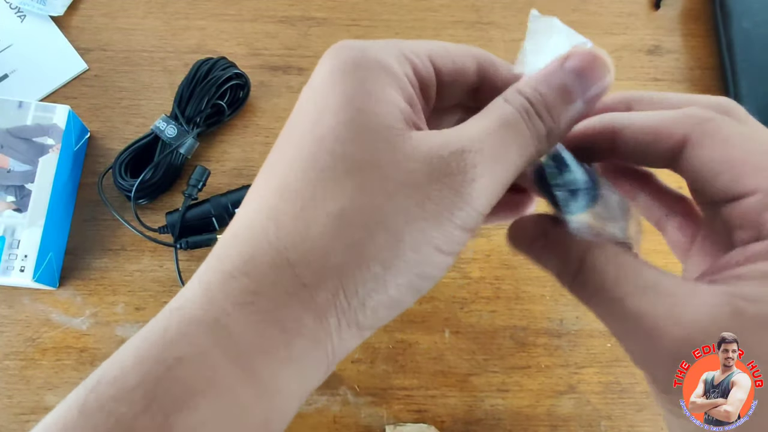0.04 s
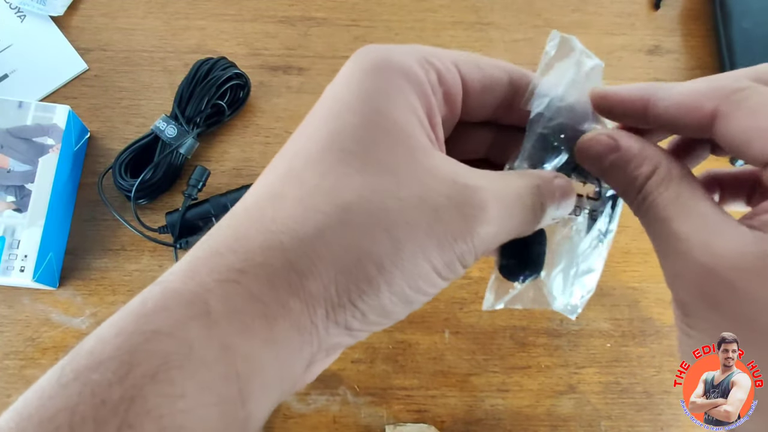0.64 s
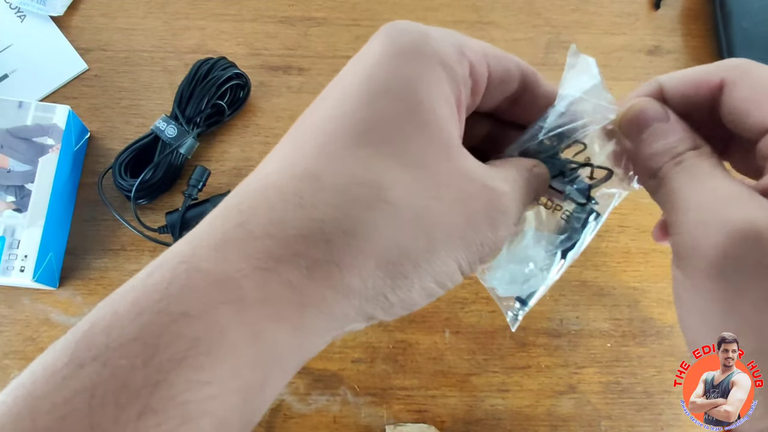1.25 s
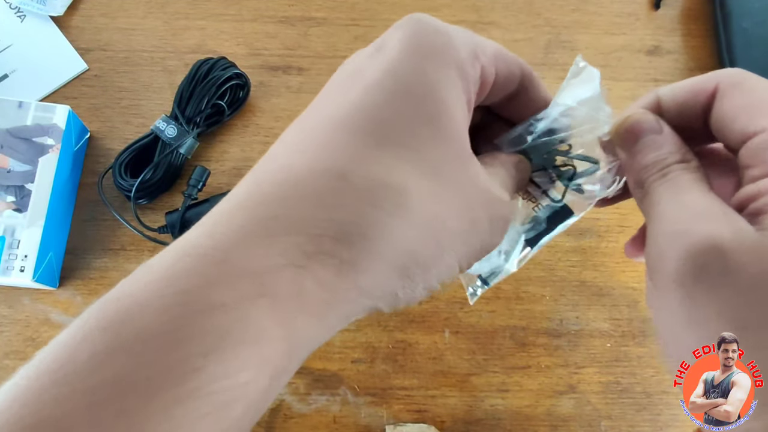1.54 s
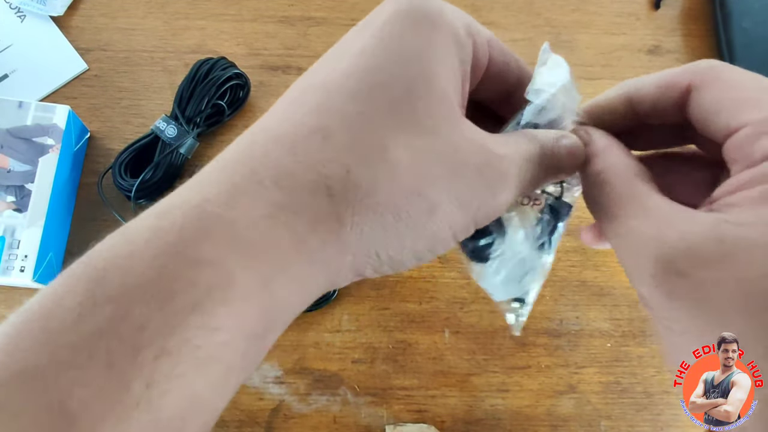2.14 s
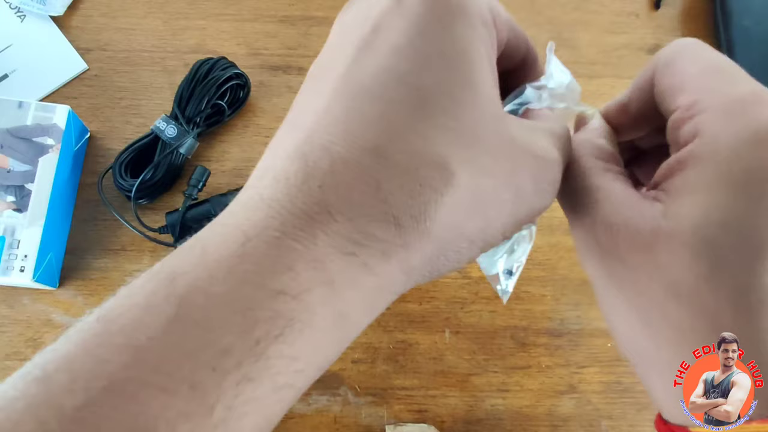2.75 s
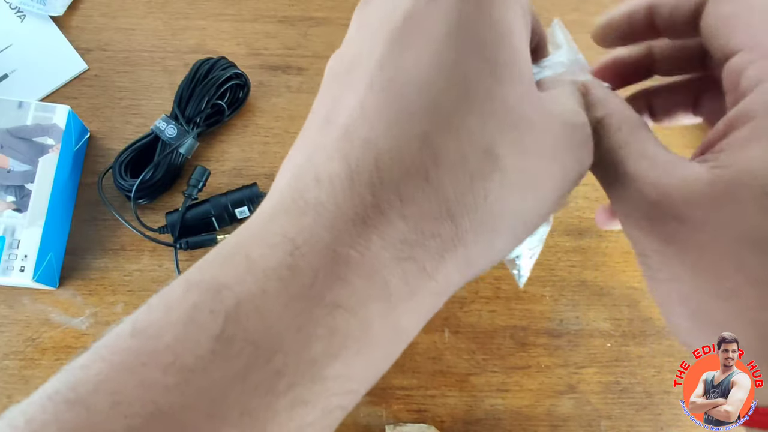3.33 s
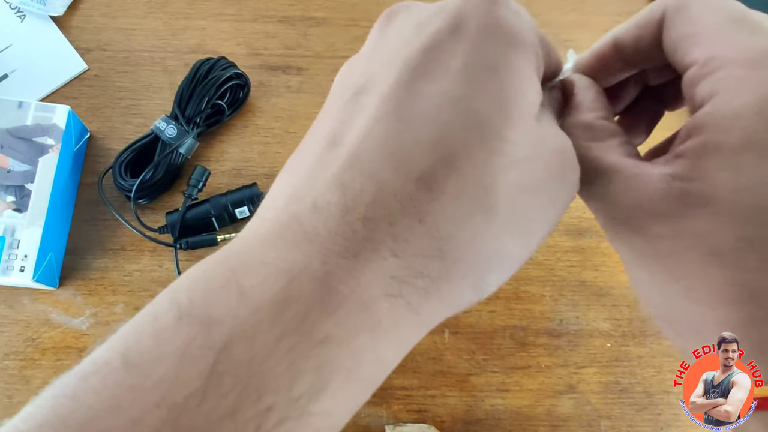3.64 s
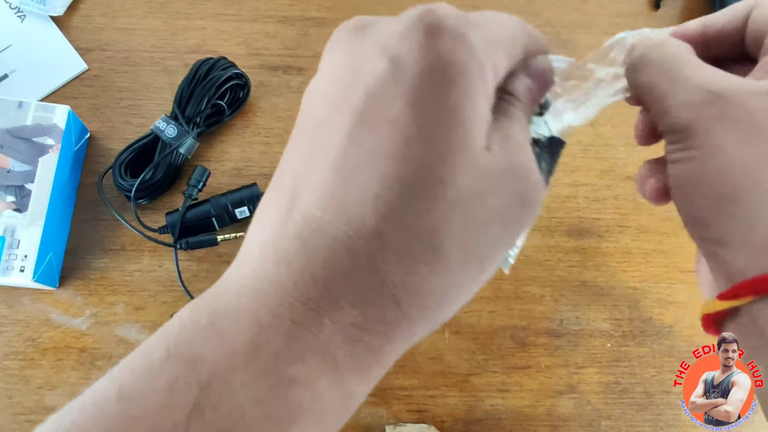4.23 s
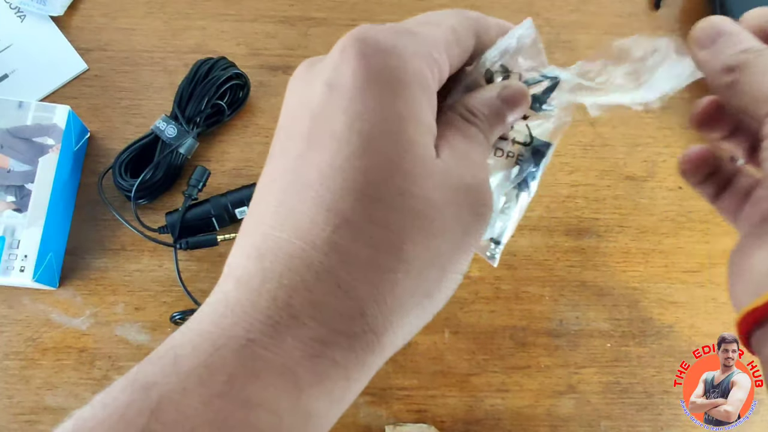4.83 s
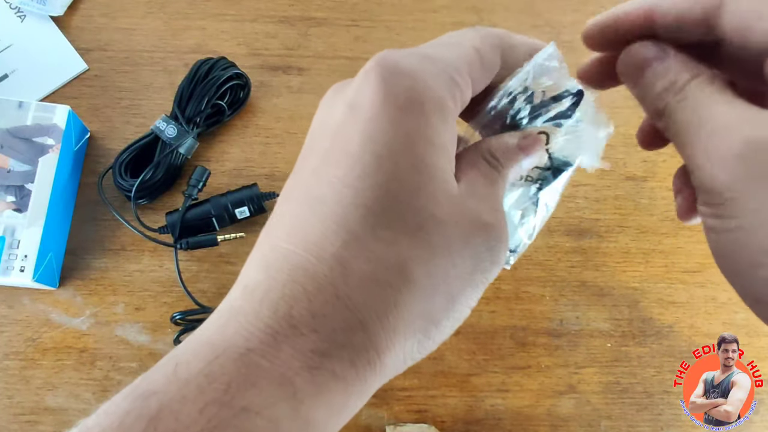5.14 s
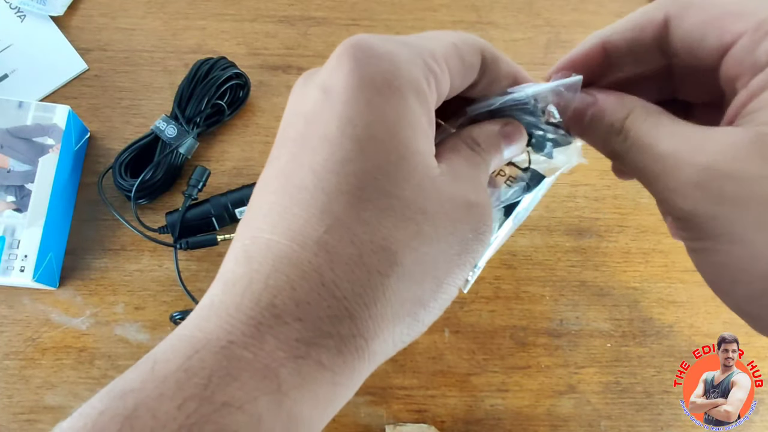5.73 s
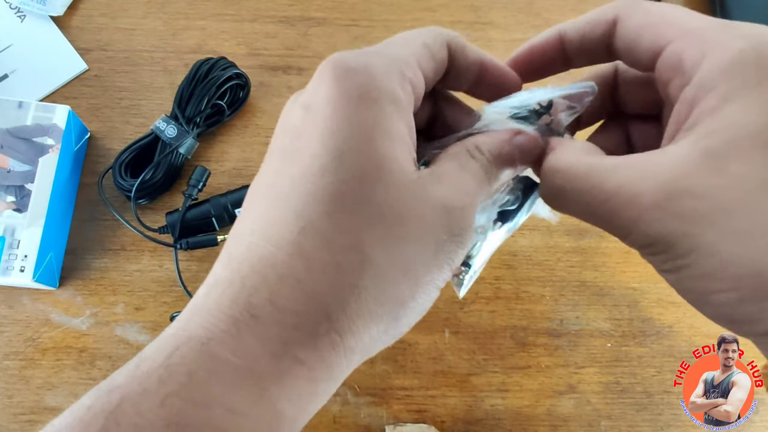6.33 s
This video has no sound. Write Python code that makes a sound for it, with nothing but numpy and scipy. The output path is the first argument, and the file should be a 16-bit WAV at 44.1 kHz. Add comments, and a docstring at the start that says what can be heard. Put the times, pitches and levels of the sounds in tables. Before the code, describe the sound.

A small plastic zip bag is handled close to the microphone in a small room. From the start, each squeeze brings fine crinkling and little ticks, with bigger creases snapping sharply at uneven intervals. The small hard contents knock lightly now and then, most clearly at about 3.1 seconds. From around 2.3 seconds the top is pinched taut and the snaps sound fuller for a second. Near 4.2 seconds the zip seal tears open in one very short, bright rasp with the loudest crackles. Busy crinkling follows until about 5 seconds, then lighter handling continues to the end at about 6.5 seconds. A few dull pops from a faulty microphone contact come around 3.6 to 3.8 seconds and again between 5 and 6 seconds. Underneath lie faint rubbing of skin, a wavering low electrical hum, rumble and hiss.

```python
"""Two hands turn a small plastic zip bag above a desk. From the start, each squeeze buckles the film
into fine crinkle and small ticks, big creases snap sharply, and now and then the contents knock.
From 2.25 s the top is pinched taut and the snaps gain body. From 3.6 s a breaking microphone contact
makes a few dull pops. Near 4.2 s the zip tears open in one short stick-slip rasp, and the handling
goes on. Under it all, in a small room, lie rubbing skin, wavering mains hum, rumble and hiss."""
import sys
import numpy as np
from scipy import signal
from scipy.fft import rfft, irfft, next_fast_len
from scipy.io import wavfile
from scipy.ndimage import uniform_filter1d

SR = 44100
rng = np.random.default_rng(int(sys.argv[2]) if len(sys.argv) > 2 else 0)


def pcm_store(signal):
    """Save signal as 16-bit PCM."""
    levels = np.round(np.clip(np.atleast_2d(signal), -1, 1) * 32767)
    wavfile.write(sys.argv[1], SR, levels.astype(np.int16).T)


N = 290178
TIME = np.arange(N) / SR

# Big creases snapping through. Each row: start in seconds, level of the first 5 ms in dB,
# ring of the facet in Hz, relative treble in dB.
BIG_CREASES = [(0.0557, -37, 5750, -15), (0.0709, -32, 8790, -6.5), (0.0957, -25.5, 3000, -8),
               (0.1803, -33, 4830, -10.5), (0.2305, -28.5, 5860, -8.5), (0.2578, -36, 4610, -8.5),
               (0.532, -28.5, 6790, -7), (0.547, -37, 5960, -9.5), (0.5742, -33, 4200, -27),
               (0.6866, -39.5, 4150, -13), (0.8108, -35.5, 4950, -7), (0.8347, -30, 5970, -7),
               (0.8651, -40.5, 4966, -8), (0.9222, -35.5, 3945, -7), (0.9417, -31, 3980, -16),
               (0.969, -37, 3986, -16), (1.0032, -27, 6010, -8), (1.011, -36, 3880, -17),
               (1.0351, -26.5, 5530, -13), (1.0962, -35, 7650, -3), (1.1702, -31, 6020, -8),
               (1.1872, -29.5, 2456, -10), (1.2055, -40, 3864, -11), (1.327, -37.5, 9620, -2),
               (1.3713, -31, 3940, -24), (1.4087, -33, 3200, -17), (1.4201, -36.5, 6920, -6),
               (1.5371, -31, 2810, -5.5), (1.5558, -28, 8020, -2), (1.5723, -29, 6026, -9),
               (1.6752, -37, 3950, -2), (1.7068, -32, 6154, -7.5), (1.8888, -36.5, 6000, -7.5),
               (1.99, -38.5, 7130, -8.5), (2.0366, -39, 6020, -5.5), (2.1442, -29.5, 5680, -8),
               (2.151, -34, 4460, -8), (2.1683, -30.5, 7460, -4), (2.2172, -29, 5010, -2.5),
               (2.2362, -26.5, 3975, -8), (2.2798, -31, 6510, -10), (2.291, -30.5, 3800, -10.5),
               (2.3098, -30, 4024, -3), (2.3944, -29, 4360, -7), (2.5109, -36, 3894, -14),
               (2.6145, -39.5, 6930, -3.5), (2.662, -36.5, 7480, -11.5), (2.6917, -37.5, 4033, -4),
               (2.8112, -30, 3840, -19), (2.8344, -38, 7060, -14), (2.9128, -28, 6186, -8),
               (2.961, -38.5, 2836, -22), (2.9737, -28, 3610, -2.5), (3.0095, -35.5, 7200, -6),
               (3.0402, -35.5, 1550, -10), (3.0513, -30, 6060, -9), (3.0871, -34, 4780, -6),
               (3.1717, -33.5, 3140, -9), (3.275, -25, 3810, -2.5), (3.321, -38.5, 4820, -12),
               (3.5043, -36, 4930, -2), (3.5157, -30.5, 6860, -3.5), (3.5515, -31, 3883, -6.5),
               (3.6061, -31, 3814, -9), (3.6782, -38.5, 4000, -13), (3.7183, -39, 7380, -11),
               (3.7355, -37, 4830, -5), (3.7824, -36, 6500, 1), (3.912, -40.5, 8230, -7),
               (4.054, -37, 6156, -9.5), (4.142, -33.5, 6370, -7), (4.1604, -28, 6260, -6),
               (4.185, -20.5, 6060, -3), (4.195, -22, 6120, -5.5), (4.2335, -19.5, 4760, -4.5),
               (4.285, -34, 2480, -11), (4.3233, -35.5, 2670, -6.5), (4.412, -33, 3880, -4),
               (4.4171, -31.5, 7340, -4), (4.429, -33.5, 4860, -6.5), (4.446, -30.5, 3804, -8),
               (4.4673, -28, 3750, -2), (4.4894, -23, 6450, -5), (4.5549, -35.5, 4900, -11),
               (4.7192, -29.5, 6540, -7.5), (4.788, -33, 5620, -10), (4.822, -36.5, 3136, -16),
               (4.8352, -34, 6145, -3), (4.905, -41, 2530, -16), (4.933, -41.5, 2755, -22.5),
               (5.1646, -33, 2561, -11), (5.3035, -39, 6990, -5), (5.3182, -36, 7170, -6),
               (5.4028, -36.5, 6700, -3), (5.5176, -38.5, 4793, -7), (5.53, -35, 2477, -13.5),
               (5.6277, -38.5, 3947, -14), (5.6374, -30.5, 7920, -7), (5.7805, -37.5, 5950, -10),
               (5.8506, -37.5, 4720, -10), (5.9086, -37.5, 3770, -17), (5.9972, -36.5, 3935, -7),
               (6.1367, -36.5, 6517, -5.5), (6.4004, -34.5, 6810, -6), (6.4562, -34.5, 4740, -11.5)]
def cracks(lead_copy_db=-18, max_lead_s=.0046):
    """Snap-through instability: big creases flip; a faint copy just ahead softens each attack."""
    out = np.zeros((2, N))
    draws = rng.random((len(BIG_CREASES), 2))
    for (s, db, ring_hz, treble_db), (slowness, lead) in zip(BIG_CREASES, draws):
        sound = undb(db) * buckle(s, ring_hz, treble_db, slowness)
        add(out, s, sound)
        add(out, s - max_lead_s * lead, undb(lead_copy_db) * sound)
    return out


# Spectrum of the snapping film. Each row: frequency in Hz, gain in dB.
FILM_SPECTRUM = [(150, -20), (450, -1), (850, -11.5), (1350, 1.5), (1850, -6), (2350, 2), (3200, -0.5),
                 (3900, 2.5), (6300, 0.5), (9000, -2), (12000, -6), (14500, -14.5), (16000, -25)]
def buckle(s, ring_hz, treble_db, slowness, slack_db=-3, taut_db=6.5):
    """Buckling: facet shape and film tension colour each snap; rms 1 over its first 5 ms."""
    taut_start_s, taut_length_s = 2.25, 1.1
    rise_s = .0005 + .0019 * slowness ** 2  # some creases flip at once, others run along the film
    sound = snap(ring_hz, rise_s, decay_s=.0016, tail_db=-13.5, tail_s=.0065)
    facet_peaks = zip(np.geomspace(2000, 15000, 18), 2.4 * rng.standard_normal(18))
    sound = colour(sound, [(1700, 0), *facet_peaks])
    low_db, body_db = slack_db + 3 * rng.standard_normal(2)
    body_db += taut_db * (0 < s - taut_start_s < taut_length_s)
    tilt = [(600, low_db), (1400, body_db), (2400, 0), (5800, 0),
            (8500, treble_db + 9), (15000, treble_db + 9.5)]
    sound = colour(colour(sound, FILM_SPECTRUM), tilt)
    return sound / np.std(sound[:, :220], axis=1, keepdims=True)


def snap(ring_hz, rise_s, decay_s, tail_db, tail_s, size=1400):
    """Damped bending waves scatter through the film while one facet resonates."""
    t = np.arange(size) / SR
    decay = np.exp(-t / decay_s) + undb(tail_db) * np.exp(-t / tail_s)
    envelope = (1 - np.exp(-t / rise_s)) * decay
    waves = rng.standard_normal((2, size)) * envelope * undb(3 * rng.standard_normal(size))
    ring = signal.lfilter(*signal.iirpeak(ring_hz, Q=11, fs=SR), waves)
    return waves + 1.6 * ring


# The fingers squeeze or turn the bag. Each row: start in seconds, length in seconds, level in dB.
FINGER_SQUEEZES = [(0, .15, -44), (0.198, 0.049, -40.5), (0.298, .1, -54), (0.422, 0.077, -44.5),
                   (0.51, 0.035, -41), (0.669, .05, -52), (0.793, 0.093, -50), (0.926, 0.067, -44.5),
                   (0.999, 0.068, -40.5), (1.15, .06, -46), (1.316, 0.045, -44), (1.53, 0.066, -45),
                   (1.692, .04, -49), (1.843, .05, -54), (2.055, 0.11, -48), (2.147, 0.24, -43.5),
                   (2.513, 0.026, -46), (2.618, 0.021, -50.5), (2.725, 0.079, -47), (2.932, .16, -45.5),
                   (3.24, 0.15, -47), (3.489, 0.091, -46), (3.604, 0.31, -51), (3.913, .05, -53),
                   (4.235, 0.11, -44), (4.398, 0.085, -39.5), (4.532, 0.034, -44.5), (4.787, 0.051, -42),
                   (5.192, 0.025, -51), (5.297, .04, -51.5), (5.471, 0.049, -51), (5.698, 0.12, -50),
                   (5.921, 0.11, -51), (6.084, .1, -52), (6.296, .17, -51)]
def effort(holding_db=-58):
    """Driving force: the strongest squeeze of each moment, or the mere hold, works the film."""
    work = np.full(N, undb(holding_db))
    for s, length_s, db in FINGER_SQUEEZES:
        work = np.maximum(work, undb(db) * gesture(s, length_s, attack_s=.0044, release_s=.055))
    return work


def ticks(work, level_db=-44, spread_db=10, follow=.25, ring_hz=3200, treble_db=-7, count=135):
    """Stress release: small creases give way in turn, faster and louder under a hard squeeze."""
    out = np.zeros((2, N))
    push = (work / np.median(work)) ** follow
    bending = np.cumsum(np.sqrt(work - .9 * work.min()))
    for k, (place, pitch, strength, slowness) in enumerate(rng.random((count, 4))):
        i = np.searchsorted(bending, (k + place) / count * bending[-1])
        gain = push[i] * undb(level_db + spread_db * (strength - .5))
        add(out, i / SR, gain * buckle(i / SR, ring_hz * 2 ** (pitch - .5), treble_db, slowness))
    return out


# Spectrum of the fine crinkle. Each row: frequency in Hz, gain in dB.
CRINKLE_SPECTRUM = [(150, -26.5), (450, 2), (850, -7), (1350, -1), (1850, -6), (2400, -2.5), (3200, -1),
                    (3900, 1.5), (6300, -3.5), (9000, -9), (12000, -8.5), (16000, -22)]
def crinkle(work, gain_db=-.1, rub_db=-8, per_second=280, scatter_db=5, count=240):
    """Crackling noise: tiny buckles of power-law size, and skin friction, follow the fingers' work."""
    grains = np.zeros((2, N))
    creases = [snap(ring_hz, rise_s=.001, decay_s=.0012, tail_db=-22, tail_s=.005, size=700)
               for ring_hz in 2000 + 7000 * rng.random(count) ** 2]
    for place, which, strength in rng.random((int(per_second * TIME[-1]), 3)):
        gain = undb(-scatter_db * np.log(strength + .03))
        add(grains, place * TIME[-1], gain * creases[int(which * count)])
    # the buckles of each moment share the energy that the fingers put in
    grains /= np.sqrt(uniform_filter1d(grains[0] ** 2, 2200) + 1e-6)
    film = grains + undb(rub_db) * rng.standard_normal((2, N))
    return unit(colour(film, CRINKLE_SPECTRUM)) * undb(gain_db) * work


def zip_opening(level_db=-28, per_second=800, scatter_db=3, fade_s=.001):
    """Stick-slip friction: the ridge leaves its groove in a dense run of ticks that shakes the film."""
    slips = (rng.random(N) < per_second / SR) * undb(scatter_db * rng.standard_normal(N))
    shaking = signal.lfilter([1], [1, -np.exp(-1 / (fade_s * SR))], slips ** 2)
    shaking /= uniform_filter1d(shaking, 500) + 1e-6  # the slips share the steady work of the pull
    rasp = colour(np.sqrt(shaking) * rng.standard_normal((2, N)), FILM_SPECTRUM)
    rasp = colour(rasp, [(500, 7), (1400, 3.4), (4000, 2.34), (12000, 6.2)])
    pull = gesture(start_s=4.162, length_s=.072, attack_s=.029, release_s=.014)
    return unit(rasp) * undb(level_db) * pull


# The contents knock under the fingers. Each row: start in seconds, level in dB, pitch in Hz.
CONTENT_KNOCKS = [(0.399, -37.5, 938), (0.754, -34.5, 1500), (1.372, -35, 542), (2.395, -34.5, 410.5),
                  (3.079, -19.5, 1493), (5.457, -41, 774), (5.532, -34, 461), (5.937, -39, 397)]
# Their modes. Each row: multiple of the pitch, gain in dB, decay in cycles of the pitch.
CONTENT_MODES = [(1, 0, 3), (1.27, -6, 2), (1.75, -10, 2)]
def knocks(rise_cycles=.5):
    """Modal vibration: small hard parts ring for a few cycles, damped by the hand."""
    out, t = np.zeros(N), np.arange(2500) / SR
    for s, db, hz in CONTENT_KNOCKS:
        for ratio, mode_db, cycles in CONTENT_MODES:
            envelope = (1 - np.exp(-hz * t / rise_cycles)) * np.exp(-hz * t / cycles)
            add(out, s, undb(db + mode_db) * np.sin(2 * np.pi * ratio * hz * t) * envelope)
    return out


# The hands rub each other. Each row: time in seconds, relative level in dB.
GRIP_LEVELS = [(0.0, -51.5), (0.35, -52.5), (2.09, -55), (2.23, -51.5), (3.08, -58.5), (4.18, -58),
               (4.38, -53), (4.62, -55.5), (5.31, -54.5), (6.58, -60.5)]
# Spectrum of that rub. Each row: frequency in Hz, gain in dB.
SKIN_SPECTRUM = [(60, -6.5), (170, -12), (260, -4), (480, -7), (750, -18), (2000, -34.5), (8000, -40)]
def hands(gain_db=-1.5):
    """Sliding friction of skin on skin makes a dull noise as the grip shifts."""
    return unit(colour(rng.standard_normal(N), SKIN_SPECTRUM)) * undb(curve(GRIP_LEVELS) + gain_db)


def room(dry, t60_s=.2, wet_db=-12.5, gap_s=.0015):
    """Reverberation: diffuse reflections decay exponentially in a small furnished room."""
    t = TIME[:SR // 2]
    tail = rng.standard_normal((2, len(t))) * undb(-60 * t / t60_s) * (t > gap_s)
    tail = colour(tail, [(400, 4), (1500, -.5), (4000, -.5), (13000, 1.5)])
    tail /= np.sqrt(np.sum(tail ** 2, axis=1, keepdims=True))
    return dry + undb(wet_db) * signal.fftconvolve(dry[:1], tail, axes=1)[:, :N]


# The microphone contact breaks. Each row: start in seconds, length in milliseconds,
# pulse level in dB, number of breaks.
CONTACT_BREAKS = [(3.5634, .85, -19, 1), (3.5712, .4, -21, 1), (3.7714, .45, -20, 1), (5.1323, .45, -26, 5),
                  (5.1394, .35, -25, 1), (5.3502, .42, -24, 1), (5.7462, .45, -22, 1),
                  (5.9602, .42, -24, 1)]
def contact_pops(coupling_hz=150, chatter_s=.00063):
    """Transient response: each break is a square dip, after which the input's bass filter rebounds."""
    dips = np.zeros(N)
    for s, ms, db, breaks in CONTACT_BREAKS:
        for k in range(breaks):
            add(dips, s + k * chatter_s, -undb(db) * np.ones(int(ms * SR / 1000)))
    pops = colour(dips, [(600, 1), (3000, -3.5), (12000, 6)])
    return signal.sosfilt(signal.butter(2, coupling_hz, "high", fs=SR, output="sos"), pops)


# The hum swells and sinks. Each row: time in seconds, level in dB.
HUM_LEVELS = [(0.0, -48), (0.05, -41.5), (0.81, -48.5), (0.93, -42), (1.13, -52.5), (1.26, -36.5),
              (1.39, -62), (1.52, -42.5), (2.02, -51.5), (2.93, -44), (3.08, -57), (3.11, -49),
              (5.62, -45.5), (5.66, -62.5), (5.74, -42), (6.25, -52), (6.4, -45.5), (6.58, -53)]
def hum(mains_hz=50, octave_db=-21, waver_db=2, waver_hz=9):
    """Mains interference: a fundamental and a weak octave, randomly modulated in amplitude."""
    phase = 2 * np.pi * mains_hz * TIME
    tone = unit(np.sin(phase) + undb(octave_db) * np.sin(2 * phase))
    waver = waver_db * np.interp(TIME * waver_hz, np.arange(200), rng.standard_normal(200))
    return tone * undb(curve(HUM_LEVELS) + waver)


# Spectra of microphone hiss and of the room's air. Each row: frequency in Hz, gain in dB.
HISS_SPECTRUM = [(300, -5.5), (1400, -1.5), (1900, -2), (3800, -1.5), (7000, -6), (11000, -5), (16000, -14)]
AIR_SPECTRUM = [(20, 15.5), (70, 12), (130, 7.5), (190, 3), (350, 3.5), (520, 2.5), (800, -8.5),
                (1500, -21), (6000, -45)]
def noise_floor(hiss_db=-59.5, rumble_db=-53, side_db=-3):
    """Stationary noise, as mid and side: broadband hiss in both, low rumble in the mid."""
    hiss_mid, hiss_side = undb(hiss_db) * unit(colour(rng.standard_normal((2, N)), HISS_SPECTRUM))
    rumble = undb(rumble_db) * unit(colour(rng.standard_normal(N), AIR_SPECTRUM))
    return hiss_mid + rumble, undb(side_db) * hiss_side


def gesture(start_s, length_s, attack_s, release_s):
    """Force envelope: a linear rise, a hold and an exponential decay."""
    rise = np.clip((TIME - start_s) / attack_s, 0, 1)
    return rise * np.exp(-np.clip((TIME - start_s - length_s) / release_s, 0, 20))


def colour(x, points):
    """Minimum-phase filtering by a spectrum of (Hz, dB) points."""
    length = x.shape[-1]
    n = 2 * next_fast_len((length + min(length // 2, 4096)) // 2)
    hz, db = np.transpose(points)
    bin_hz = np.arange(n // 2 + 1) * SR / n
    log_gain = np.log(undb(np.interp(np.log(bin_hz + 1), np.log(hz), db)))
    cepstrum = irfft(log_gain)
    cepstrum[1:n // 2] *= 2  # folding onto positive time makes the filter causal
    cepstrum[n // 2 + 1:] = 0
    return irfft(rfft(x, n) * np.exp(rfft(cepstrum)))[..., :length]


def add(out, s, sound):
    """Superposition: mix a sound in at s seconds."""
    part = out[..., max(int(s * SR), 0):][..., :sound.shape[-1]]
    part += sound[..., :part.shape[-1]]


def curve(rows):
    """Linear interpolation of (seconds, value) rows at every sample."""
    return np.interp(TIME, *np.transpose(rows))


def undb(db):
    """Decibels to amplitude ratio."""
    return 10 ** (np.asarray(db) / 20)


def unit(x):
    """Normalisation to rms 1."""
    return x / np.sqrt(np.mean(x ** 2) + 1e-18)


# Stereo width. Each row: frequency in Hz, gain of the side signal in dB.
SIDE_SPECTRUM = [(300, -59), (1000, -58), (2600, -72), (4000, -51), (6000, -14.5), (12000, -8)]
def scene():
    """Mid-side stereo: bag, room and background add up, and only the treble spreads."""
    work = effort()
    bag_mid, bag_side = room(cracks() + ticks(work) + crinkle(work) + zip_opening() + knocks())
    noise_mid, noise_side = noise_floor()
    mid = bag_mid + noise_mid + hands() + hum() + contact_pops()
    side = colour(bag_side + noise_side, SIDE_SPECTRUM)
    return np.array([mid + side, mid - side])


def record(dry, top_hz=15900):
    """Band limiting: a steep low-pass filter cuts the highest treble."""
    return signal.sosfilt(signal.ellip(8, .2, 70, top_hz, fs=SR, output="sos"), dry)


dry = scene()
out = record(dry)
pcm_store(out)
```